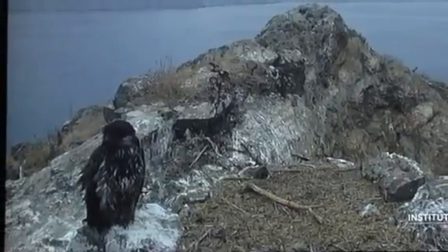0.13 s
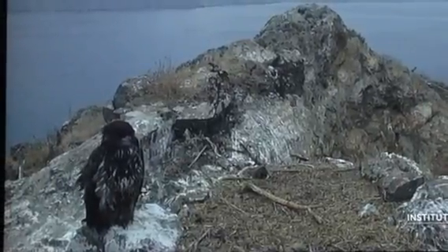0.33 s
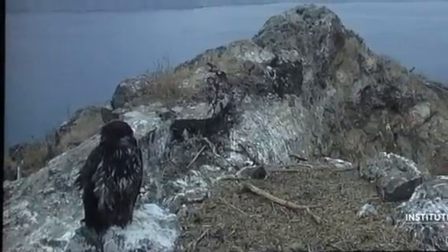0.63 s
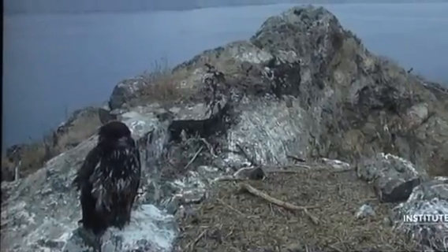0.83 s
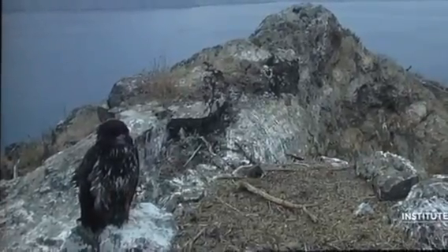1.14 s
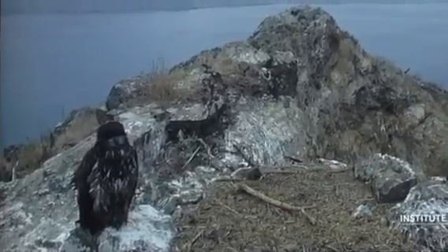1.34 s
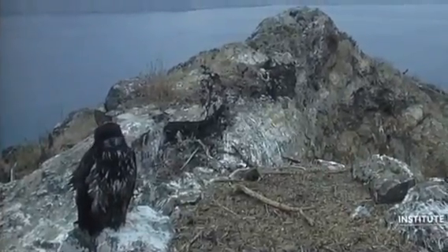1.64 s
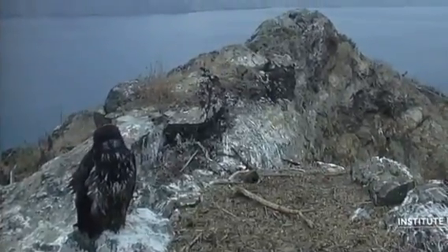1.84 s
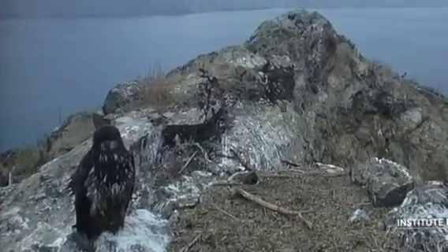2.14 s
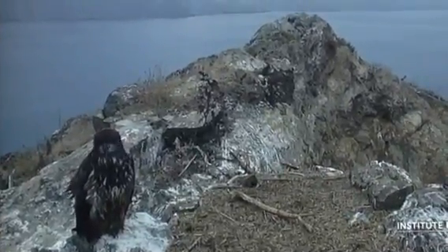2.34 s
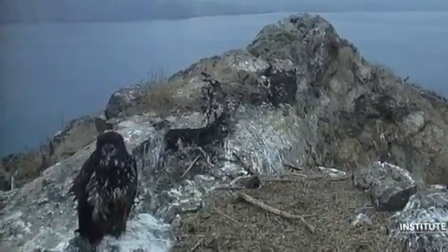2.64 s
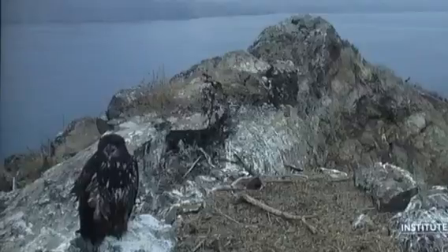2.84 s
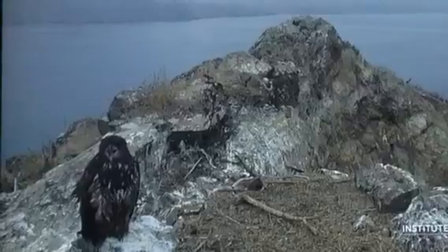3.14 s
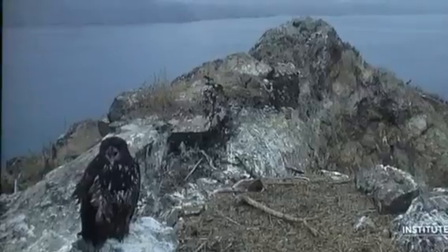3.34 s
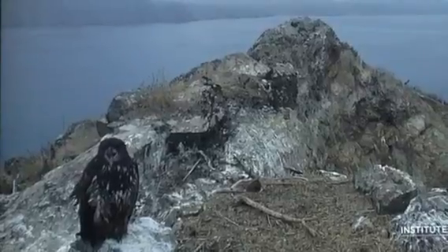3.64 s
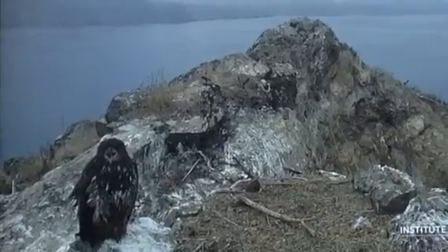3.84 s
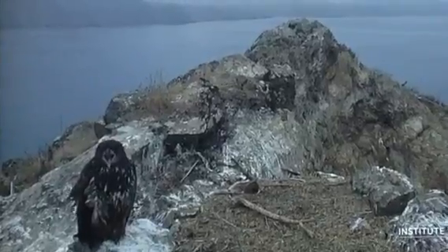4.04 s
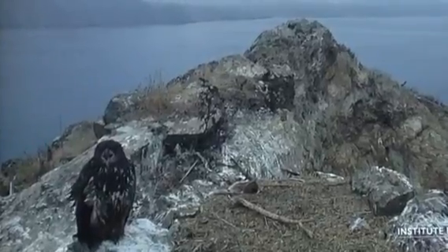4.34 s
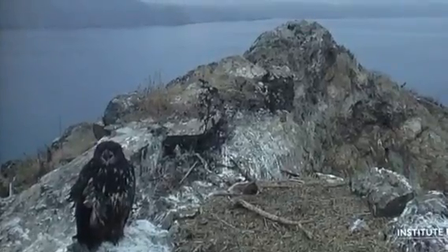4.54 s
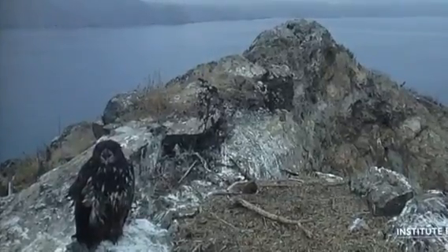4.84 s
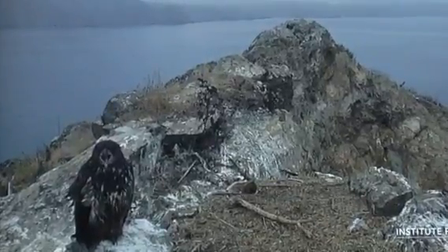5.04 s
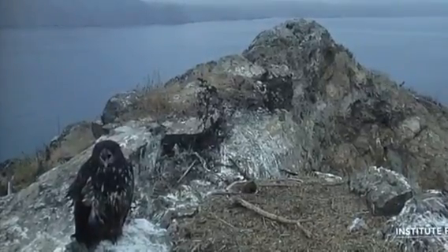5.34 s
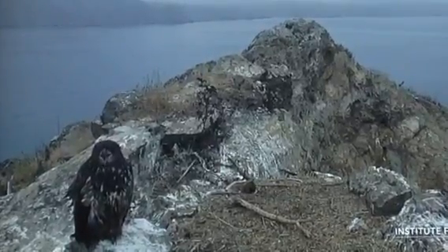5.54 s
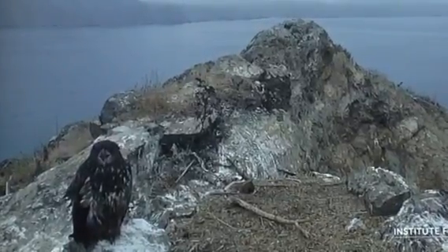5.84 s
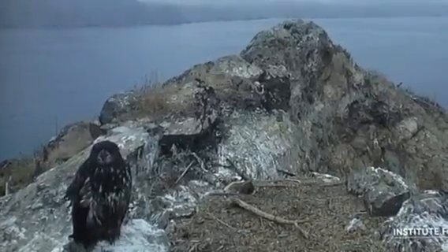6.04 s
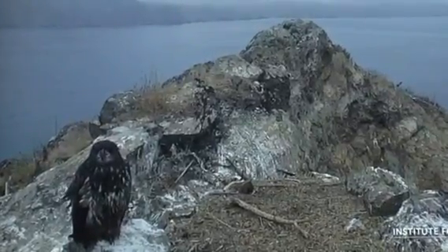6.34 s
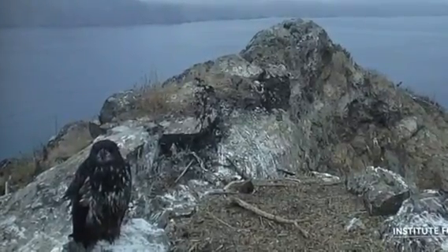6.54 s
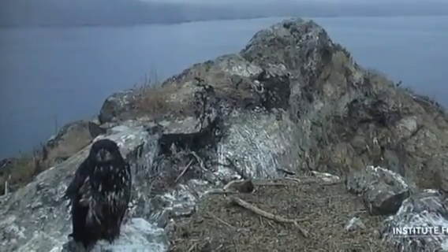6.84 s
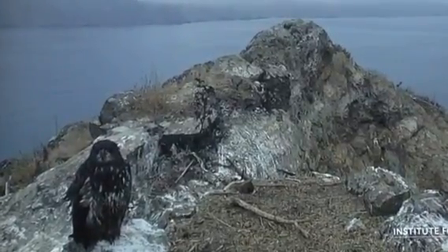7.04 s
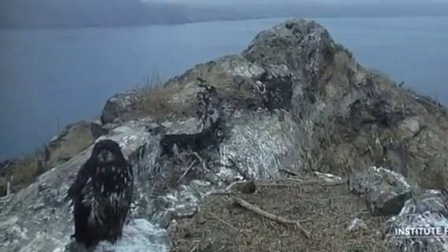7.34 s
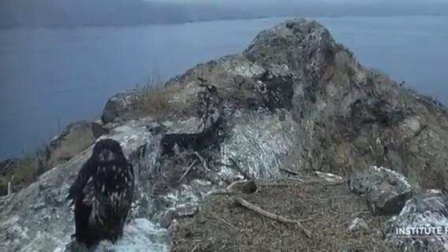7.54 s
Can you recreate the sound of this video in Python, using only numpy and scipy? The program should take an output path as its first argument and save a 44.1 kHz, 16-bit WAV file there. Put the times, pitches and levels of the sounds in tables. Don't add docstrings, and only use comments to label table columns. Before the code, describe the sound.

Soft, steady surf wash and faint hiss run for about two and a half seconds. Then a young eagle close by pipes twelve quick calls, each a short buzzy upward yelp breaking into a piercing whistle and dropping away. The first are brief, the middle ones fuller, the last two clipped and weak. Rock and cliff echoes trail off. The surf dips under the calls. Everything sounds boxy, played from a small loudspeaker in a room.

```python
import sys
import numpy as np
from scipy import signal
from scipy.fft import rfft, irfft
from scipy.io import wavfile
from scipy.ndimage import uniform_filter1d

SR = 44100
rng = np.random.default_rng(int(sys.argv[2]) if len(sys.argv) > 2 else 0)


def level_to_linear(level):
    exponent = np.asarray(level, float) / 20
    return 10 ** exponent


def unload_wav(signal):
    wavfile.write(
        sys.argv[1],
        SR,
        np.round(np.clip(np.atleast_2d(signal).T, -1, 1) * 32767).astype(np.int16),
    )


N = 339349
HZ = np.maximum(np.arange(rfft(np.zeros(N)).size) * SR / N, 1)

# f/Hz, density level/dB
SURF_SPECTRUM = [(18, -83), (30, -19.5), (108, -36), (143, -5.5), (172, 2.5), (305, -26.5), (386, -17),
                 (634, -14), (844, -16.5), (2270, -22.5), (2660, -20.5), (4140, -22.5), (6630, -29.5),
                 (10100, -23.5), (15300, -39.5)]
# f/Hz, density level/dB
HISS_SPECTRUM = [(20, -35), (33, -5), (50, -4), (100, -4), (300, -17.5), (3000, -9), (15000, -14.5)]
# f/Hz, width/Hz, level/dB
ROOM_MODES = [(430, 120, 12), (639, 37, 8.7), (1119, 33, 5.6), (1206, 9.1, 13), (1415, 26, 1.8),
              (1617, 31, 1.8), (1754, 13.5, 15.4), (1890, 6.7, 1.1), (1950, 11, 12), (2035, 36, 12),
              (2286, 72, 17), (2554.6, 58, 9.2), (2838, 34.6, 13.7), (3192, 26, 2.5), (3402, 40, 11.8),
              (3790, 35, 1.6), (4038, 75, 11.7), (4060, 82, 11), (4488, 52, 18.4), (5500, 19, 2.3),
              (5230, 100, 11), (5572, 24, 16.3), (6020, 240, 9.6), (7180, 140, 4.1), (6879, 19, 4.2),
              (7650, 59, 6.2), (7180, 295, 14.2), (8337, 200, 3.7), (8125, 61, 4.2), (8170, 22, 1.1)]

# start t/s, length/s, from f/Hz, to f/Hz, level/dB
FIRST_OPENING = [
    (2.474, .061, 1194, 1695, -17),
]
FADING_OPENINGS = [
    (2.716, .038, 975, 1662, -16.5),
    (3.03, 0.041, 642, 1715, -17.5),
]
BREAKING_OPENINGS = [(3.386, 0.035, 518.5, 839, -27), (3.734, 0.031, 523, 833, -26),
                     (4.104, 0.034, 527, 819, -27), (4.444, 0.034, 519, 852, -27),
                     (4.78, .032, 527.4, 835, -27.5), (5.1, 0.036, 551, 856, -26),
                     (5.395, 0.027, 519, 830, -27)]
CLIPPED_OPENINGS = [
    (5.684, 0.023, 472, 717, -33),
    (5.896, 0.0216, 487, 704, -35.5),
]
# share of the length/0-1, share of the climb/0-1, level/dB
FIRST_SHAPE = [(0, 0.0078, -52), (.26, .33, -6.5), (.59, .75, 1.5), (.79, .82, -6), (1, 1, -27)]
FADING_SHAPE = [(0, 0.066, -43.5), (0.401, .62, -14.5), (.62, .87, 0.2), (.8, .91, -7.5), (1, 0.99, -25.5)]
BREAKING_SHAPE = [(0, 0.016, -25), (.4, .55, -9.5), (.68, .66, -4.5), (.8, .86, -0.5), (1, 1, 1.6)]
CLIPPED_SHAPE = [(0, 0, -20), (.6, 0.933, 0.4), (1, 1, -7.5)]
# f/Hz, level/dB
THROAT = [(450, -29), (690, 0), (830, -26.5), (1150, 2), (1450, -22.5), (1650, -11), (2300, 7.5),
          (3000, 5.5), (3600, -18.5), (4200, -20), (4800, -35), (5400, -28.5), (6500, -53.5), (9000, -66.5)]

# start t/s, length/s, from f/Hz, to f/Hz, level/dB
PIPES = [
    (2.53, 0.022, 2073, 1990, -27),
    (5.704, .029, 2515, 3415, -25),
    (5.916, .024, 2520, 3425, -23.5),
]
# share of the length/0-1, share of the leap/0-1, level/dB
PIPE_SHAPE = [(0, 0.0054, -10), (.36, 0.074, 0), (.64, 0.32, 4.8), (.76, .8, 3), (1.001, 0.9, -8.5)]
# t/s, f it breaks to/Hz, f it rests on/Hz, level/dB, last flick level/dB
CLOSINGS = [(2.547, 1960, 1967, -33.5, -42.5), (2.808, 2388, 2080, -28, -45.5),
            (3.169, 2310, 1987, -33, -50.5), (3.535, 2204, 1970, -33.5, -56.5),
            (3.903, 2180, 1985, -33.5, -63), (4.256, 2140, 1969, -34, -55), (4.59, 2300, 1990, -31, -62),
            (4.916, 2300, 2000, -31, -61), (5.226, 2300, 1996, -30.5, -55.5),
            (5.515, 2300, 2004, -30.5, -53), (5.782, 1975, 1874, -34, -58), (5.985, 1890, 1832, -35.5, -70)]
# t after its start/s, pitch ratio, share of the way to the last flick/0-1, level/dB
DROP_SHAPE = [(.008, 1.02, 0.15, -3.5), (0.021, 0.989, 0.02, 1.5), (0.027, 0.97, 0.78, -9.5),
              (.03, 0.6, 0.95, 0), (0.045, 0.526, 0.94, -11.5)]

# start t/s, length/s, f of the dip/Hz, f of the arch top/Hz, level/dB
SOFT_WHISTLES = [
    (2.753, .054, 2341, 2420, -21.5),
    (3.068, .1, 2361, 2665, -21.5),
]
FULL_WHISTLES = [(3.421, 0.11, 2476, 2716, -21.5), (3.768, 0.13, 2454, 2763, -22),
                 (4.138, 0.11, 2630, 2789, -23.5), (4.478, 0.11, 2566, 2772, -24),
                 (4.812, 0.1, 2622, 2770, -22), (5.135, 0.093, 2643, 2725, -24),
                 (5.428, .086, 2634, 2720, -22)]
SHORT_WHISTLES = [
    (5.727, 0.0455, 2718, 2683, -20.5),
    (5.937, 0.0365, 2662, 2706, -22),
]
# f of the second/Hz, level/dB
SECOND = [(3300, -34), (3900, -17.5), (4250, -9), (4500, -36), (4800, -19.5), (5100, -40), (5450, -31.5),
          (6200, -63.5)]
# f of the fundamental/Hz, level/dB
THIRD = [(2380, -83), (2460, -36.5), (2550, -32.5), (2650, -31), (2800, -27)]
# t/s, level/dB
FLICKS = [
    (2.782, -47),
    (3.082, -45),
]


def at_hz(points, hz):
    known_hz, level_db = np.array(points).T
    return np.interp(np.log(hz), np.log(known_hz), level_db)


def drift(rate_hz, size):
    r = np.exp(-2 * np.pi * rate_hz / SR)
    noise = rng.standard_normal(size + 4000)
    slow = signal.lfilter([1], [1, -2 * r, r * r], noise)[4000:]
    return slow / slow.std()


def coloured(spectrum):
    x = irfft(rfft(rng.standard_normal(N)) * level_to_linear(at_hz(spectrum, HZ)), N)
    return x / x.std()


def surf():
    return level_to_linear(-53.5) * coloured(SURF_SPECTRUM) * level_to_linear(0.25 * drift(1.7, size=N))


def ducking(loud, knee_db, ratio, release_db_s, attack_s):
    level_db = 10 * np.log10(uniform_filter1d(loud ** 2, 441) + 1e-12)
    ramp = release_db_s * np.arange(N) / SR
    wanted_db = ratio * (level_db - knee_db)
    cut_db = np.maximum(np.maximum.accumulate(wanted_db + ramp) - ramp, 0)
    r = np.exp(-1 / (attack_s * SR))
    return level_to_linear(-signal.lfilter([1 - r], [1, -r], cut_db))


def masking(x, margin_db, up_db, down_db, fade_db_s):
    frame = dict(fs=SR, window="hann", nperseg=2048, noverlap=1536)
    hz, t, z = signal.stft(x, **frame)
    bark = 6 * np.arcsinh(hz / 600)
    band = np.floor(bark * 2).astype(int)
    numbers = np.arange(band.max() + 1)
    member = band == numbers[:, None]
    level_db = 10 * np.log10(member @ abs(z[0]) ** 2 + 1e-16)
    apart = (numbers[:, None] - numbers) / 2
    slope_db = np.where(apart > 0, up_db * apart, -down_db * apart)
    shadow_db = np.max(level_db[None] - slope_db[:, :, None], 1) - margin_db
    ramp = fade_db_s * t
    shadow_db = np.maximum.accumulate(shadow_db + ramp, axis=1) - ramp
    kept = np.clip((level_db - shadow_db) / 2, 0.01, 1)
    kept[:2 * 14] = 1
    return signal.istft(z * kept[band], **frame)[1][:, :N]


def resonance(hz, width):
    return 1 / (1 + 1j * (HZ ** 2 - hz ** 2) / (HZ * width))


def loudspeaker(x, lift_db):
    response = 1 + sum(level_to_linear(level_db + lift_db) * resonance(hz, width) for hz, width, level_db in ROOM_MODES)
    response = response * (1 - 0.75 * resonance(6650, 1300))
    return level_to_linear(-3.5) * irfft(rfft(x) * response, N)


def echoes(x, t60, gap_s, low_hz, cut_hz):
    t = np.arange(round(2 * SR)) / SR
    spray = rng.choice([-1, 1], len(t)) * level_to_linear(-60 * t / t60) * np.clip(t / gap_s, 0, 1) ** 2
    b, a = signal.butter(1, [low_hz, cut_hz], "band", fs=SR)
    spray = signal.lfilter(b, a, spray / np.linalg.norm(spray))
    return signal.fftconvolve(x, spray)[:N]


def tails(bird):
    room = level_to_linear(-6) * echoes(bird, t60=0.18, gap_s=0.0034, low_hz=404, cut_hz=11200)
    rocks = level_to_linear(-8) * echoes(bird, t60=0.26, gap_s=0.018, low_hz=1890, cut_hz=3440)
    cliffs = level_to_linear(-26) * echoes(bird, t60=3.3, gap_s=0.073, low_hz=2300, cut_hz=2900)
    return room + rocks + cliffs


def cracks():
    t = np.arange(N) / SR
    swell = np.zeros(N)
    for start_s, *_ in FULL_WHISTLES + SHORT_WHISTLES:
        swell += np.exp(-np.where(t < start_s, (start_s - t) / 0.012, (t - start_s) / 0.0029))
    band = signal.butter(2, [1400, 5030], "band", fs=SR, output="sos")
    air = signal.sosfilt(band, rng.standard_normal(N))
    return level_to_linear(-42.5 + 2.5 * drift(240, size=N)) * swell * air


def note(rows, jitter):
    s, hz, *levels = np.transpose(rows)
    t = np.arange(s[0] - 0.002, s[-1] + 0.0047, 1 / SR)
    pitch = uniform_filter1d(np.interp(t, s, hz), size=130)
    pitch = pitch * (1 + jitter * drift(250, size=8000)[:len(t)])
    phase = 2 * np.pi * np.cumsum(pitch) / SR
    levels = [np.interp(t, s, column) for column in levels]
    edge = np.clip(np.minimum(t - t[0], t[-1] - t) / 0.0039, 0, 1)
    return round(t[0] * SR), pitch, phase, edge * level_to_linear(levels[0]), levels


def climbs(rows, shape):
    return [[(s + length * part, from_hz + (to_hz - from_hz) * way, level_db + swell_db)
             for part, way, swell_db in shape]
            for s, length, from_hz, to_hz, level_db in rows]


def closings():
    notes = []
    for s, from_hz, hz, level_db, flick_db in CLOSINGS:
        rows = [(s, from_hz, level_db)]
        for after, ratio, share, dip_db in DROP_SHAPE:
            rows.append((s + after, hz * ratio, level_db + share * (flick_db - level_db) + dip_db))
        notes.append(rows)
    return notes


def piped(notes, jitter):
    out = np.zeros(N)
    for rows in notes:
        at, pitch, phase, gain, _ = note(rows, jitter)
        second = level_to_linear(at_hz(SECOND, 2 * pitch))
        out[at:at + len(gain)] += gain * (np.sin(phase) + second * np.sin(2 * phase))
    return out


def throaty(notes, jitter, breath_db, clean_hz):
    out, k = np.zeros(N), np.arange(1, 10)[:, None]
    band = signal.butter(4, [2000, 3500], "band", fs=SR, output="sos")
    for rows in notes:
        at, pitch, phase, gain, _ = note(rows, jitter)
        weights = level_to_linear(at_hz(THROAT, k * pitch))
        stack = np.sum(weights * np.sin(k * phase), 0) / np.sqrt(np.sum(weights ** 2, 0))
        breath = signal.sosfilt(band, rng.standard_normal(size=8000)[:len(gain)])
        breath = breath / (1 + (pitch / clean_hz) ** 4)
        out[at:at + len(gain)] += gain * (stack + level_to_linear(breath_db) * breath)
    return out


def openings():
    notes = climbs(FIRST_OPENING, FIRST_SHAPE) + climbs(CLIPPED_OPENINGS, CLIPPED_SHAPE)
    notes += climbs(FADING_OPENINGS, FADING_SHAPE) + climbs(BREAKING_OPENINGS, BREAKING_SHAPE)
    return throaty(notes, jitter=0.021, breath_db=-5.5, clean_hz=1180)


def arch(s, length, dip_hz, top_hz, level_db, flutter,
         overshoots=1, rebound_share=0.597, late_s=0, loss_db=0):
    t = np.linspace(0, length, 60)
    overshoot_hz, overshoot_s, full_dip_s = 2776, 0.0029, 0.01295
    dip_s, fall_s = full_dip_s * overshoots, min(0.0371, 0.4 * length)
    since = np.maximum(t - dip_s, 0)
    rebound = 1 - np.exp(-since / 0.007)
    slow_rise = np.clip(since / max(length - fall_s - dip_s, 0.002), 0, 1)
    rise = rebound_share * rebound + (1 - rebound_share) * slow_rise
    sag = np.clip(1 - (length - t) / fall_s, 0, 1) ** 2.15
    hz = dip_hz + (top_hz - dip_hz) * rise - (top_hz - min(2490, 0.975 * top_hz)) * sag
    over = np.clip((full_dip_s - t) / (full_dip_s - overshoot_s), 0, 1)
    hz = hz + overshoots * (overshoot_hz - dip_hz) * over
    accent_db = 2 * np.exp(-t / 0.01)
    first_db = level_db + accent_db + 3.5 * flutter[((s + t) * SR).astype(int)]
    asleep = np.minimum(np.exp(-(t - late_s) / 0.0039 * 2), 1)
    third_db = at_hz(THIRD, hz) - 6 * sag - 34 * asleep - loss_db * t / length
    flicks_db = [db - 9.4 * ((s + t - at) / 0.0022) ** 2 for at, db in FLICKS]
    third_db = np.max([third_db] + flicks_db, axis=0)
    return np.transpose([s + t, hz, first_db, third_db])


def arches():
    flutter = drift(35, size=N)
    soft = [arch(*w, flutter, overshoots=0, rebound_share=0.1, late_s=0.025) for w in SOFT_WHISTLES]
    full = [arch(*w, flutter) for w in FULL_WHISTLES]
    short = [arch(*w, flutter, late_s=0.0027, loss_db=9.5) for w in SHORT_WHISTLES]
    return soft + full + short


def whistles():
    low, bright = np.zeros((2, N))
    follows = 0.21
    for rows in arches():
        at, pitch, phase, gain, (level_db, third_db) = note(rows, jitter=0.0025)
        rasp = 1 + 0.3 * drift(180, size=8000)[:len(gain)]
        second_db = at_hz(SECOND, 2 * pitch) + follows * np.maximum(third_db + 31, -25)
        second = rasp ** 2 * level_to_linear(second_db)
        low[at:at + len(gain)] += gain * (np.sin(phase) + second * np.sin(2 * phase))
        highest = level_to_linear(-22) * np.sin(4 * phase) + level_to_linear(-14) * np.sin(5 * phase)
        upper = np.sin(3 * phase) + rasp * level_to_linear(follows * (third_db + 26.5)) * highest
        bright[at:at + len(gain)] += gain * level_to_linear(third_db - level_db) * upper
    return low, level_to_linear(4) * bright


def scene():
    low, bright = whistles()
    pipes = piped(climbs(PIPES, PIPE_SHAPE) + closings(), jitter=0.017)
    bird = low + bright + openings() + pipes + cracks()
    gain = ducking(bright + level_to_linear(-9.5) * low, knee_db=-38, ratio=0.72, release_db_s=28.5, attack_s=0.0067)
    heard = loudspeaker(bird + tails(bird) + surf() * gain, lift_db=-5)
    return (heard + level_to_linear(-64.5) * coloured(HISS_SPECTRUM))[None]


def low_pass(x):
    return signal.sosfilt(signal.butter(12, 15410, fs=SR, output="sos"), x)


def record(dry):
    cut = signal.sosfilt(signal.cheby2(12, 60, 16200, fs=SR, output="sos"), dry)
    cut = signal.sosfilt(signal.butter(3, 45, "high", fs=SR, output="sos"), cut)
    limited = cut * ducking(cut[0], knee_db=-22.5, ratio=0.37, release_db_s=407.5, attack_s=0.001)
    thinned = masking(limited, margin_db=21, up_db=14, down_db=24, fade_db_s=175)
    return low_pass(thinned)


dry = scene()
out = record(dry)
unload_wav(out)
```